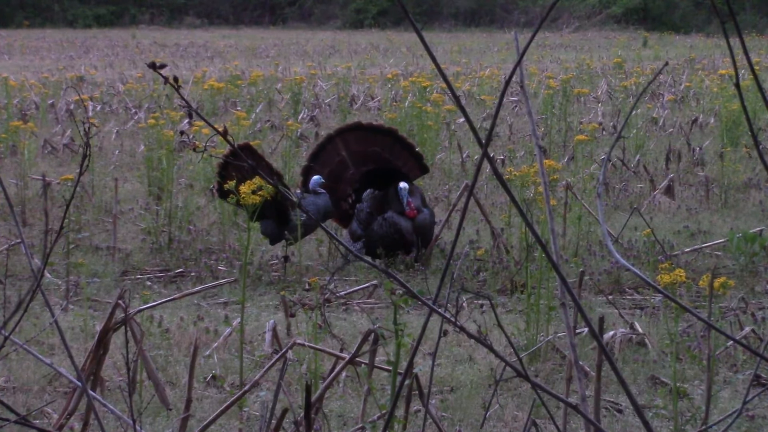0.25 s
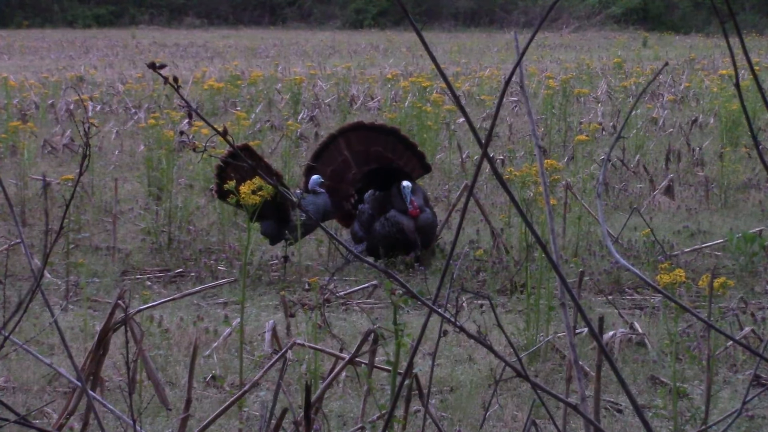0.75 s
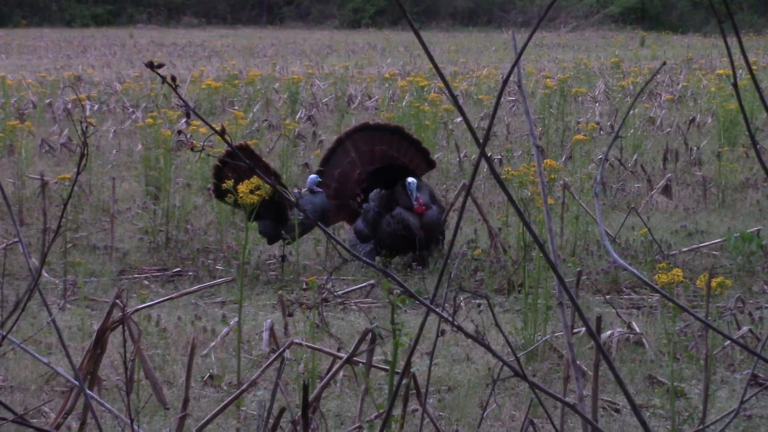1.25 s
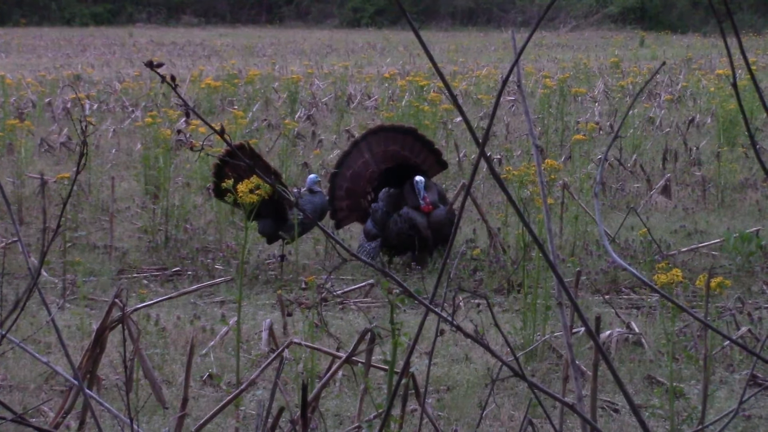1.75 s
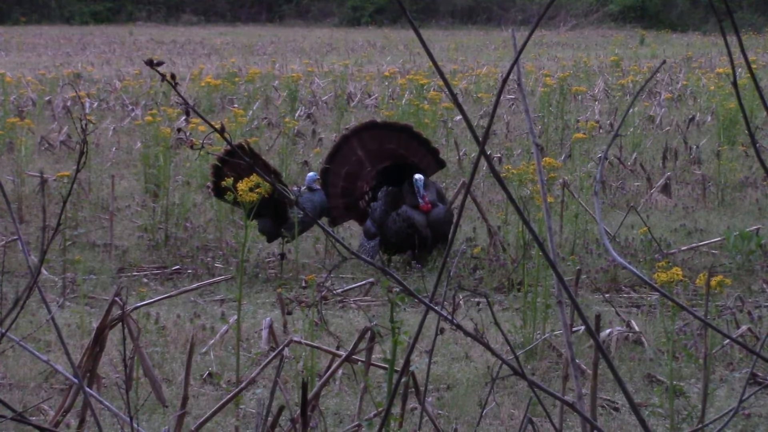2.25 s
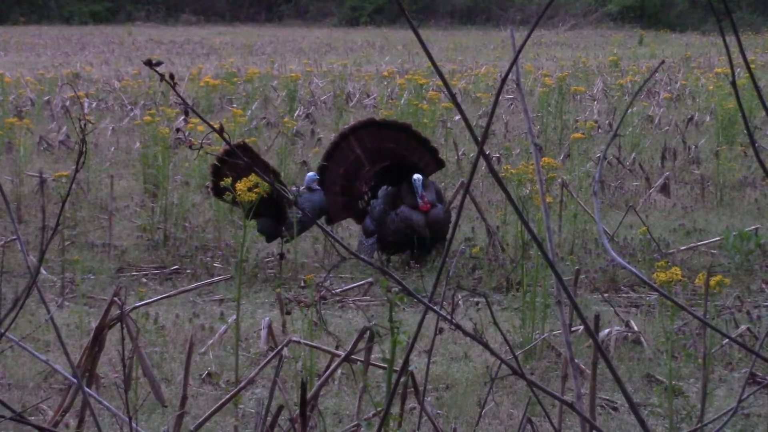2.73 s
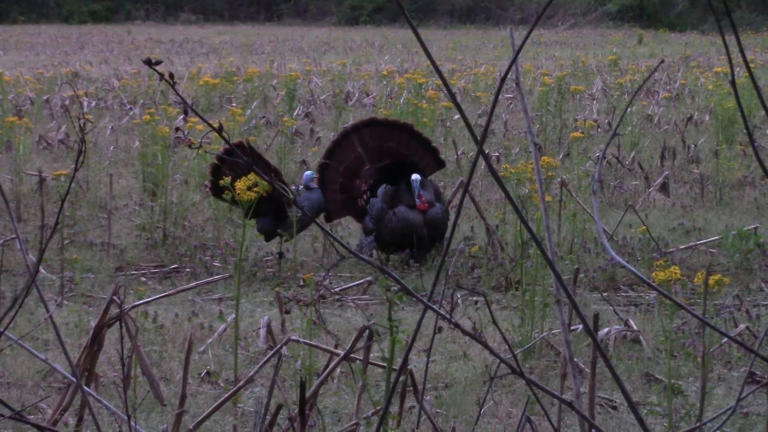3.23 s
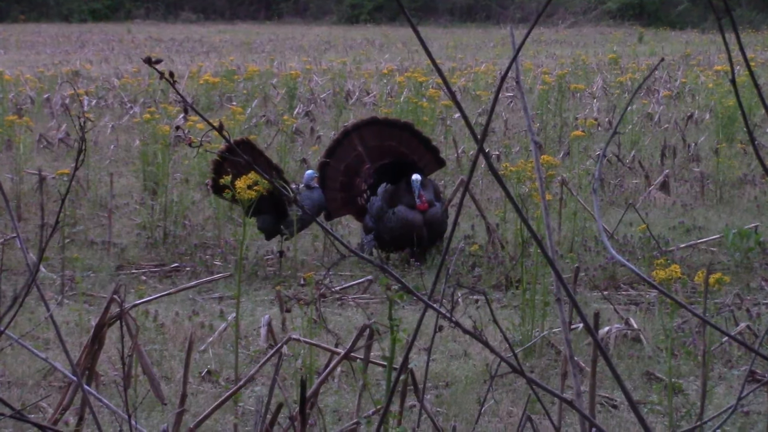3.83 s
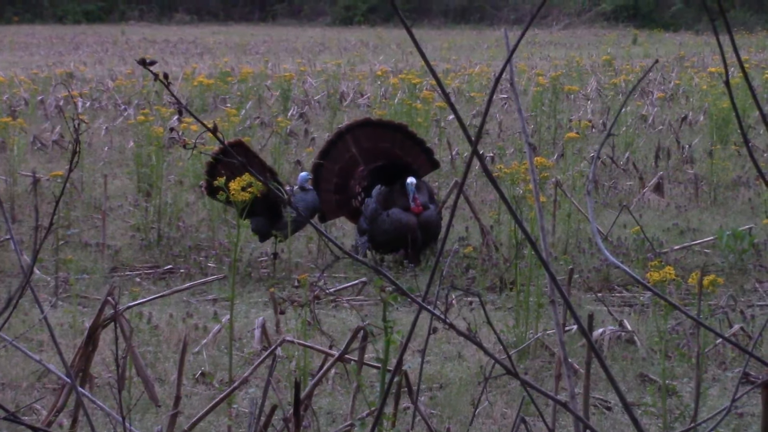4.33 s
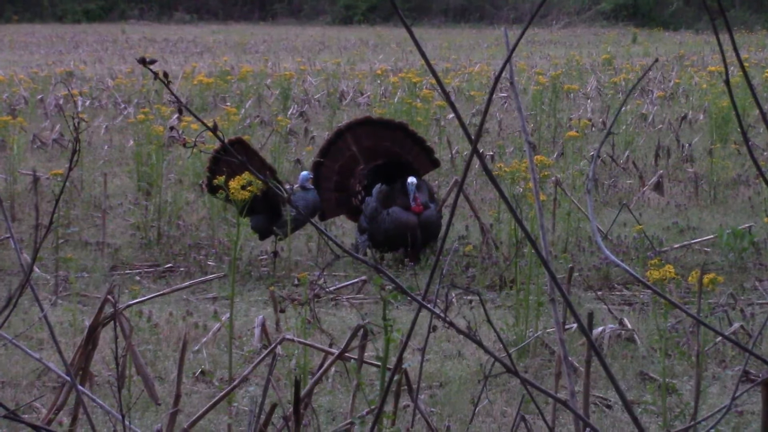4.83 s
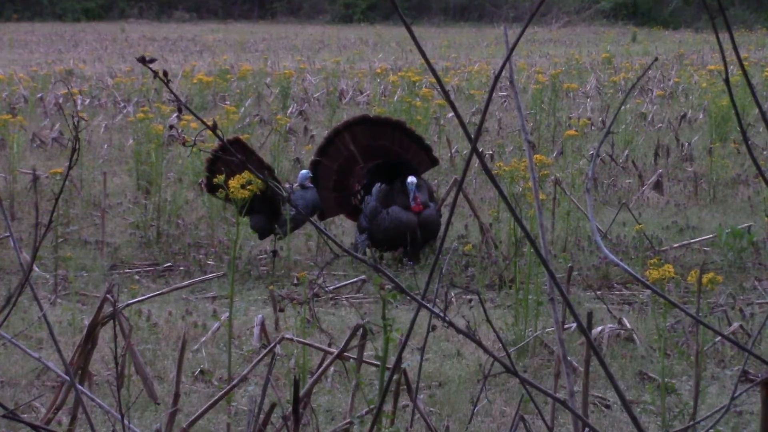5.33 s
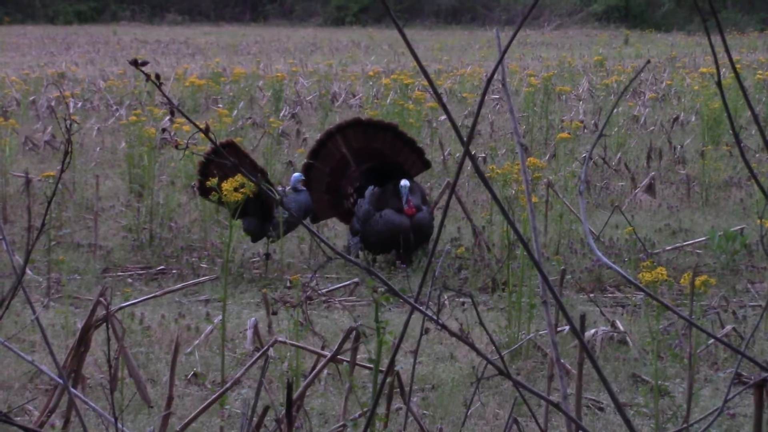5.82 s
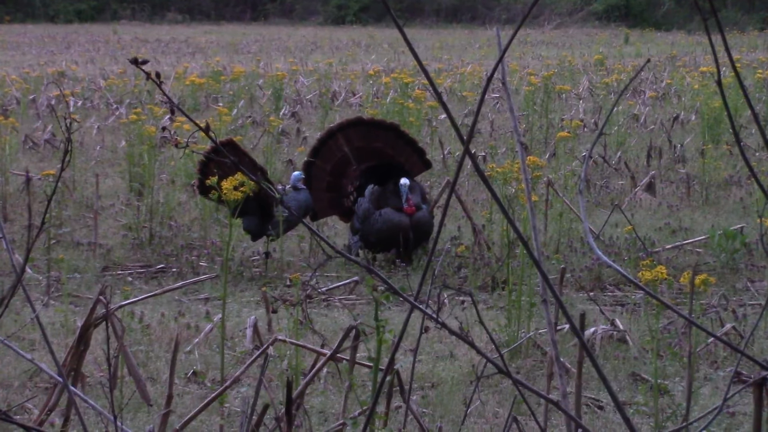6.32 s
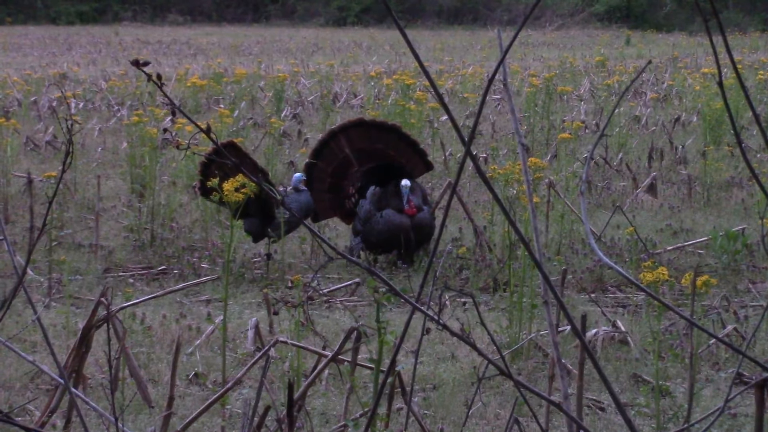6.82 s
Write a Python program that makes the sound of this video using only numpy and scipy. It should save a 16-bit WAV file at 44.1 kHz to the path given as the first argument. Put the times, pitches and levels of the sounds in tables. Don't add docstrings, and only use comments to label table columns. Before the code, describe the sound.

A soft, steady hush of open field runs throughout. From 0 s distant songbirds give arched whistles near 2.8 kHz and a faint string of falling slurs about four times a second until 2.5 s; dry stalks tick around 0.8 and 1.1 s, and a quick warble comes at 1.7 s. At 2.5 s a turkey close to the microphone begins nine loud, sharp yelps, each under a tenth of a second: about 2.5, 2.7, 3.0, 3.3, 3.7, 4.15, 4.55, 5.0 and 5.4 s. The first is a clean whistle; later ones break into rasp and flick upward at the end, some after a soft low murmur. A faint whine sits near 4.35 s. Trees return weak, quick echoes. Faint peeps and dry rustles fall between yelps, with a crisp snap at 5.5 s. The warble repeats at 5.8 s, and distant whistles close at 6.6 to 7 s.

```python
import sys
import numpy as np
from scipy import signal
from scipy.fft import rfft, irfft
from scipy.io import wavfile
from scipy.ndimage import uniform_filter1d, minimum_filter1d

SR = 44100
rng = np.random.default_rng(int(sys.argv[2]) if len(sys.argv) > 2 else 0)


def voltage_ratio(decibels):
    exponent = np.asarray(decibels, float) / 20
    return 10 ** exponent


def wav_record(signal):
    frames = np.transpose(np.atleast_2d(signal))
    bounded = np.clip(frames, -1, 1)
    quanta = np.round(bounded * 32767).astype(np.int16)
    wavfile.write(sys.argv[1], SR, quanta)


N = 311786

# pitch_hz, level_db [dB per Hz]
HUSH_SPECTRUM = [(12, -42), (20, -6.5), (140, -12.5), (333, -0.5), (631, 0.5), (705, 3), (1300, -1.5),
                 (2470, -2.5), (2760, -2), (3000, -5), (7100, -15.5), (10800, -24.5), (15500, -33.5)]
# pitch_hz, likeness [0-1]
HUSH_LIKENESS = [(60, 0.05), (130, 0.51), (290, 0.34), (640, 0.049), (1410, 0.15), (3100, 0.51),
                 (6820, 0.24), (15000, 0.33)]
# start_s, length_s, top_hz, climb_hz, level_db
WHISTLER_ARCHES = [
    (0, 0.11, 2767, 88.4, -39),
    (0.177, 0.15, 2787, 180, -37.5),
    (0.397, 0.18, 2765, 167, -38.5),
    (.95, 0.15, 2846, 203, -52),
    (1.196, 0.167, 2795, 80, -48.5),
    (6.606, 0.21, 2720, 227, -40.5),
    (6.83, 0.18, 2725, 193, -37),
]
# time_s, pitch_hz, level_db
SLUR_SHAPE = [
    (-.006, 2550, 5),
    (.03, 1950, 7.5),
    (.06, 1730, 8.5),
    (.1, 1700, 4.5),
]
# start_s, level_db
SLUR_STARTS = [(.05, -51), (.31, -53), (.57, -52.5), (.835, -50.5), (1.105, -53), (1.365, -53),
               (1.625, -51), (1.895, -51), (2.16, -51.5), (2.42, -48.5)]
# start_s, length_s, from_hz, to_hz, level_db
WARBLE_GLIDES = [
    (-.004, .01, 3900, 4400, 0),
    (.005, 0.04, 4920, 4830, -4.5),
    (0.075, 0.0103, 4000, 2840, 3),
    (0.166, 0.0096, 3540, 2540, -3),
    (0.337, 0.018, 2330, 4120, 2),
    (0.357, .03, 4470, 2935, 2.5),
    (0.428, .095, 1960, 3260, 1.5),
    (0.529, 0.032, 3160, 2895, 1.5),
    (0.589, .035, 2900, 2570, 2.5),
    (.615, .07, 2650, 2030, -5),
]
# start_s, level_db
WARBLE_STARTS = [
    (1.7, -37),
    (5.77, -37),
]
# start_s, length_s, from_hz, to_hz, level_db
LONE_GLIDES = [
    (.131, .026, 2915, 3225, -47),
    (.421, .021, 3085, 3205, -49),
    (1.166, .08, 3315, 3245, -45),
    (1.561, .071, 3365, 3255, -46),
    (3.43, .25, 4085, 4185, -57),
    (4.311, .051, 2665, 2735, -45.5),
    (4.481, .041, 2765, 2785, -54),
    (4.526, .031, 2385, 2325, -44.5),
    (6.796, .036, 3175, 3125, -44.5),
]
# start_s, length_s, top_hz, climb_hz, level_db
MIDDLE_ARCHES = [
    (3.808, 0.099, 2790, 200, -41.5),
    (3.889, .11, 2720, 163.5, -42),
    (4.076, .05, 2785, 200, -37),
    (4.358, .1, 2850, 420, -36),
    (4.66, 0.26, 2744, 71, -47.5),
]
# start_s, peak_db, centre_hz, width_hz, t60_s
SHORT_BURSTS = [(.785, -38, 450, 340, 0.041), (1.132, -35.5, 6100, 1000, 0.17),
                (1.136, -39.5, 4400, 400, .15), (1.136, -50, 10100, 2490, 0.16),
                (1.14, -33.5, 2110, 1300, 0.072), (1.162, -38, 6500, 1000, .03),
                (1.25, -57.5, 8800, 3000, 1.3), (1.93, -41, 4300, 2500, .02), (3.5, -43, 3500, 3960, .03),
                (4.055, -32.5, 1120, 1200, 0.018), (4.243, -28, 1350, 2180, .05),
                (4.655, -27, 1300, 700, 0.18), (5.515, -27.5, 1190, 1000, 0.22),
                (5.527, -24.5, 5800, 5020, 0.02), (5.526, -24.5, 1800, 1800, .033),
                (5.8, -35, 1510, 1800, 0.028), (6.555, -46, 5100, 2630, .36), (6.8, -32, 553, 150, 0.045),
                (6.85, -31.5, 2830, 5460, 0.016)]
# start_s, length_s, level_db, opening_slide_s, closing_sweep_s
YELPS = [
    (2.488, 0.071, -4.5, 0.018, .031),
    (2.666, 0.085, -8, .025, .022),
    (2.969, 0.073, -7.5, .011, .028),
    (3.297, .073, -6.5, 0.015, 0.022),
    (3.700, 0.085, -6, .02, .03),
    (4.148, .066, -8, .02, .014),
    (4.563, .072, -6.5, .016, .027),
    (5.011, .073, -7, 0.014, 0.027),
    (5.4234, .068, -5.5, 0.011, 0.031),
]
# opening_hz, held_hz, lowest_hz, closing_hz
YELP_PITCHES = [(1260, 1080, 1045, 2100), (1527, 735, 760, 1800), (1554, 1300, 1100, 1800),
                (1684, 1590, 1150, 2200), (1200, 1135, 1090, 1800), (1603, 1350, 1190, 1500),
                (1314, 1270, 1140, 1800), (1700, 1240, 1150, 1800), (1586, 1138, 1150, 1900)]
YELP_BREAKS = [(0.04, .04, 0.65, 0.03, 0), (.2, 0.5, .72, .03, 0.003), (0.16, 0.91, .6, 0.14, 1.05),
               (.5, .85, .45, 0.1, 0.47), (.7, .85, 0.46, 0.14, .1), (.75, .85, .5, 0.7, 0.57),
               (.55, 1, .55, 0.1, 1.04), (0.39, 0.7, .5, .08, 0), (0.47, .9, 0.64, 0, 0.12)]
# pitch_hz, level_db
THROAT = [(300, -3.5), (650, -3.5), (1100, -0.5), (1470, 5), (1800, -11.5), (2150, -20), (2500, -28.5),
          (2900, -15), (3400, -25), (4300, -40.5), (5500, -45), (7000, -57.5)]
# pitch_hz, level_db [dB per Hz]
RASP_SPECTRUM = [(120, -71.5), (200, -36.5), (494, -23.5), (683, -13.5), (946, -8.5), (1090, -5),
                 (1430, -1), (2210, -8.5), (2420, -20), (2950, -14.5), (3230, -29.5), (3540, -10.5),
                 (4390, -33.5), (9210, -54), (15000, -76.5)]
# time_s, level_db, pitch_hz
SQUEAK = [
    (2.984, -61, 8130),
    (2.996, -38, 8050),
    (3.014, -61, 7900),
]
# start_s, length_s, final_db
LEADS = [(2.963, 0.0053, -26.5), (3.263, 0.038, -34.5), (3.686, 0.014, -31.5), (4.116, 0.012, -36.5),
         (4.133, .018, -28), (4.558, 0.0065, -36.5), (4.973, .04, -26.5), (5.394, .029, -33)]
# time_s, level_db, pitch_hz, rasp [0-1], half_pitch [share of every second swing]
WHINE = [
    (4.29, -51, 332.5, 0.37, 0.1),
    (4.35, -39.5, 400, 0.66, 0),
    (4.39, -41, 337, 0.43, 0.0071),
    (4.45, -43.5, 351, 1, 0),
    (4.475, -56, 329, 0.48, 0),
]
# delay_s, level_db
TREES = [
    (.03, -32.5),
    (.055, -37.5),
    (.088, -46.5),
    (0.169, -47.5),
]


def evened(x):
    return x / np.sqrt(np.mean(x ** 2) + 1e-20)


def read(points, hz):
    f, value = np.transpose(points)
    return np.interp(np.log(hz + 1), np.log(f + 1), value)


def unrolled(rows):
    s, *columns = np.transpose(rows)
    t = np.arange(s[0], s[-1], 1 / SR)
    return max(s[0], 0), [np.interp(t, s, c) for c in columns]


def add(mix, s, sound):
    part = mix[..., round(s * SR):][..., :sound.shape[-1]]
    part += sound[..., :part.shape[-1]]


def drift(count, hz):
    lowpass = signal.butter(2, hz, fs=SR, output="sos")
    settle = 2000
    return evened(signal.sosfilt(lowpass, rng.standard_normal(count + settle))[settle:])


def band(x, hz, width_hz):
    edges = np.clip([hz - width_hz / 2, hz + width_hz / 2], 10, 20000)
    return signal.sosfilt(signal.butter(2, edges, "bandpass", fs=SR, output="sos"), x)


def tail(t60, start=0.0072):
    t = np.arange(SR // 2) / SR
    noise = band(rng.standard_normal((2, len(t))), 2120, 5200)
    taps = noise * voltage_ratio(-60 * t / t60) * (t > start)
    return taps / np.linalg.norm(taps[0])


def hush():
    level_db, patch_db = -40, 0.93
    frames, hz = N // 256 + 5, np.fft.rfftfreq(1024, 1 / SR)
    a, b, c, d, patches = rng.standard_normal((frames, 513, 5)).T
    patches = evened(uniform_filter1d(uniform_filter1d(patches, 12, 0), 14, 1))
    same = np.clip(read(HUSH_LIKENESS, hz), -1, 1)[:, None]
    left = a + 1j * b
    right = same * left + np.sqrt(1 - same ** 2) * (c + 1j * d)
    z = np.array([left, right])
    z *= voltage_ratio(read(HUSH_SPECTRUM, hz)[:, None] + patch_db * patches)
    return voltage_ratio(level_db) * evened(signal.istft(z, nperseg=1024, noverlap=768)[1][:, :N])


def arch(start, length, top_hz, climb_hz, level_db):
    top_place, fade_db_per_s = .55, -130
    u = np.linspace(0, 1, num=12)
    hz = top_hz - climb_hz * (u / top_place - 1) ** 2
    db = level_db + fade_db_per_s * length * np.clip(u - top_place, 0, 1)
    return np.transpose([start + length * u, hz, db])


def glide(start, length, from_hz, to_hz, level_db):
    ease, peak_place, rise_db, fade_db = 1.4, 0.43, -4.5, -3.5
    u = np.linspace(0, 1, num=8)
    hz = to_hz + (from_hz - to_hz) * (1 - u) ** ease
    db = level_db + np.interp(u, [0, peak_place, 1], [rise_db, 0, fade_db])
    return np.transpose([start + length * u, hz, db])


def whistle(rows, waver=0.0048):
    s, (hz, db) = unrolled(rows)
    n = len(hz)
    tone = np.sin(2 * np.pi * np.cumsum(hz * (1 + waver * drift(n, 60))) / SR)
    flutter_db = 1.5 * drift(n, 40)
    return s, np.sqrt(2) * voltage_ratio(db + flutter_db) * tone * signal.windows.tukey(n, .25)


def far(notes, pan_db, wet_db, t60, waver):
    bird = np.zeros(N)
    for rows in notes:
        add(bird, *whistle(rows, waver))
    direct = bird * voltage_ratio([[pan_db / 2], [-pan_db / 2]])
    smear = signal.fftconvolve(bird[None], tail(t60, 0.0042), axes=1)[:, :N]
    return direct + voltage_ratio(wet_db) * smear


def songbirds():
    arches = [arch(*note) for note in WHISTLER_ARCHES]
    slurs = [np.add(SLUR_SHAPE, (s, 0, db)) for s, db in SLUR_STARTS]
    warbles = [glide(*note) + (s, 0, db) for s, db in WARBLE_STARTS for note in WARBLE_GLIDES]
    strays = [glide(*note) for note in LONE_GLIDES] + [arch(*note) for note in MIDDLE_ARCHES]
    out = far(arches, pan_db=1.6, wet_db=-5, t60=0.63, waver=0.01)
    out += far(slurs, pan_db=-1.2, wet_db=-21, t60=.5, waver=0.0022)
    out += far(warbles, pan_db=7.9, wet_db=-2.8, t60=0.59, waver=0.0071)
    out += far(strays, pan_db=.3, wet_db=-6, t60=1.0, waver=0.0075)
    return out


def short_bursts():
    out, t = np.zeros((2, N)), np.arange(8000) / SR
    for s, db, hz, width_hz, t60 in SHORT_BURSTS:
        noise = evened(band(rng.standard_normal(len(t)), hz, width_hz))
        snap = noise * voltage_ratio(db + 3.5 - 60 * t / t60)
        swell = np.minimum(t / (0.031 * t60), 1)
        add(out, s, snap * swell * np.ones((2, 1)))
    return out


def shaped(start, length, level_db, slide, sweep, pitch, breaks):
    t = np.linspace(0, length, num=160)
    opening, held, lowest, closing = pitch
    rasp, worst, place, last, half = breaks
    turn = length - sweep

    attack_s = .002 + .007 * rasp ** 2
    release_s, drop_s, edge_db, snap_db, trail_db = 0.0081, 0.0031, -15, 2.5, -13
    catch_db, catch_s = -3, .005
    times = [0, attack_s, 3 * attack_s, length - release_s, length - release_s + drop_s, length]
    db = np.interp(t, times, [edge_db, snap_db, 0, 0, trail_db, edge_db])
    db = db + catch_db * worst * np.exp(-((t - turn) / catch_s) ** 2)

    flip_hz, flip_s, sweep_bend = 1000, .004, 2.2
    base = max(lowest, flip_hz)
    times = [0, slide - flip_s, slide, turn, turn + flip_s]
    hz = np.interp(t, times, [opening, max(held, flip_hz), held, lowest, base])
    hz = hz + (closing - base) * np.clip((t - turn) / sweep, 0, 1) ** sweep_bend
    strain_hz, strain_db_per_hz, strain_most_db = 1380, -.018, -8
    db = db + np.clip(strain_db_per_hz * (hz - strain_hz), strain_most_db, 0) * (t > turn)

    open_rasp, rasp_bend, clear_share = .4, 1.5, .55
    worst_s, clear_s = place * length, turn + clear_share * sweep
    rough = np.interp(t, [0, slide, worst_s, clear_s], [open_rasp * rasp, rasp, rasp, last])
    rough = rough + (worst - rasp) * np.interp(t, [slide, worst_s, clear_s], [0, 1, 0]) ** rasp_bend
    halves = half * np.interp(t, [0, slide, 2 * slide, turn], [0.57, 0.63, 0.85, 0])
    return np.transpose([start + t, level_db + db, hz, rough, halves])


def lead(start, length, final_db):
    low_hz, top_hz, rise_s, swell_db, rasp = 420, 565, .028, -12.5, .15
    t = np.linspace(0, length, num=8)
    hz = top_hz - (top_hz - low_hz) * np.clip((length - t) / rise_s - .3, 0, 1)
    db = final_db + swell_db * (1 - t / length) ** 2
    return np.transpose([start + t, db, hz, rasp + 0 * t, 0 * t])


def yelp(rows):
    s, (db, hz, rasp, half) = unrolled(rows)
    n, rasp = len(hz), np.clip(rasp, 0, 1)

    turns = np.cumsum(hz * (1 + .08 * rasp * drift(n, 250))) / SR
    heights = np.array([voltage_ratio(read(THROAT, k * hz)) for k in range(1, 7)])
    clean = sum(h * np.sin(2 * np.pi * k * turns) for k, h in enumerate(heights, 1))
    half_pitch = np.sin(np.pi * turns) + 0.16 * np.sin(3 * np.pi * turns)
    clean = clean + half * heights[0] * half_pitch
    clean *= np.sqrt(2 / (heights ** 2).sum(0)) * (1 + 0.5 * rasp * drift(n, 320))

    swing_hz = .42 * hz * np.exp(.22 * drift(n, 220))
    swings = np.diff(np.floor(np.cumsum(swing_hz) / SR), prepend=0)
    swings = swings * voltage_ratio(3.0 * rng.standard_normal(n)) + 0.037 * rng.standard_normal(n)
    ringing = voltage_ratio(read(RASP_SPECTRUM, np.fft.rfftfreq(n, 1 / SR)))
    rough = evened(irfft(rfft(swings) * ringing, n))

    hiss = voltage_ratio(-41.5) * evened(band(rng.standard_normal(n), 8630, 1600))
    hiss = hiss + voltage_ratio(-53.5) * evened(band(rng.standard_normal(n), 11500, 5000))
    share = 1 - (1 - rasp) ** 1.6
    voice = np.sqrt(1 - share ** 2) * clean + share * rough + np.sqrt(rasp + .1) * hiss
    return s, voltage_ratio(db) * signal.windows.tukey(n, .06) * voice


def turkey():
    near = np.zeros(N)
    calls = [shaped(*row, pitch, breaks) for row, pitch, breaks in zip(YELPS, YELP_PITCHES, YELP_BREAKS)]
    for rows in calls + [lead(*row) for row in LEADS] + [WHINE]:
        add(near, *yelp(rows))
    add(near, *whistle(np.array(SQUEAK)[:, [0, 2, 1]]))
    near = signal.sosfiltfilt(signal.butter(2, 280, "highpass", fs=SR, output="sos"), near)

    low = signal.sosfiltfilt(signal.butter(2, 4500, fs=SR, output="sos"), near)
    out = np.array([low, np.roll(low, 2)]) * voltage_ratio([[5.0], [6.0]])
    out += (near - low) * voltage_ratio([[7.0], [-1.5]])

    blur = band(rng.standard_normal((len(TREES), 2, 1200)) * np.hanning(1200), 2280, 2600)
    for (delay, db), taps in zip(TREES, blur):
        echo = signal.oaconvolve(near[None], taps / np.linalg.norm(taps[0]), axes=1)
        add(out, delay, voltage_ratio(db) * echo)
    bright = near + voltage_ratio(9.5) * band(near, 3120, 1800)
    scatter = signal.fftconvolve(bright[None], tail(0.53), axes=1)[:, :N]
    return out + voltage_ratio(-28.5) * scatter


def scene():
    return hush() + songbirds() + short_bursts() + turkey()


def roll_off(x):
    return signal.sosfilt(signal.butter(12, 15630, fs=SR, output="sos"), x)


def record(dry):
    power = abs(uniform_filter1d((dry ** 2).mean(0), 300))
    fall = np.arange(N) * 9.0 / SR
    loud_db = np.clip(10 * np.log10(power + 1e-12) + 14, 0, 4.5)
    duck_db = np.maximum(np.maximum.accumulate(loud_db + fall) - fall, 0)
    x = dry * voltage_ratio(-duck_db)

    crest = -minimum_filter1d(-abs(x).max(0), size=61)
    x = np.clip(x / np.maximum(uniform_filter1d(crest, size=41) / 1.081, 1), -1, 1)

    wobble = band(power, 30, 30)
    x = x + voltage_ratio(-43.0) * wobble + voltage_ratio(-52.5) * np.roll(wobble, 3600)
    return roll_off(x)


dry = scene()
out = record(dry)
wav_record(out)
```